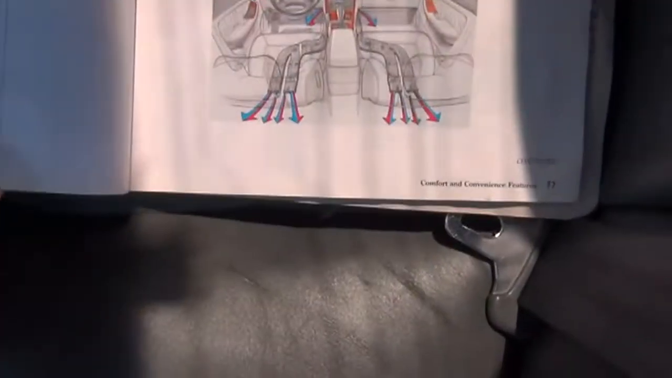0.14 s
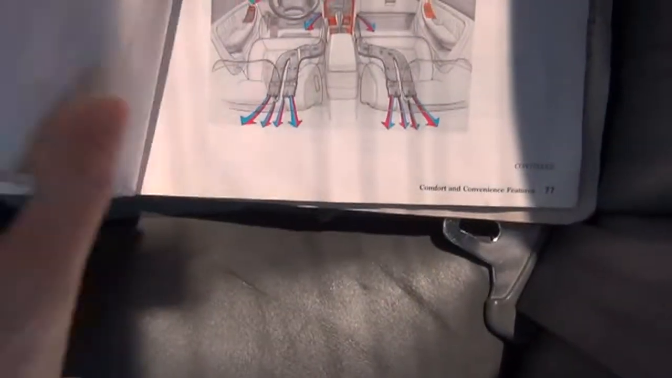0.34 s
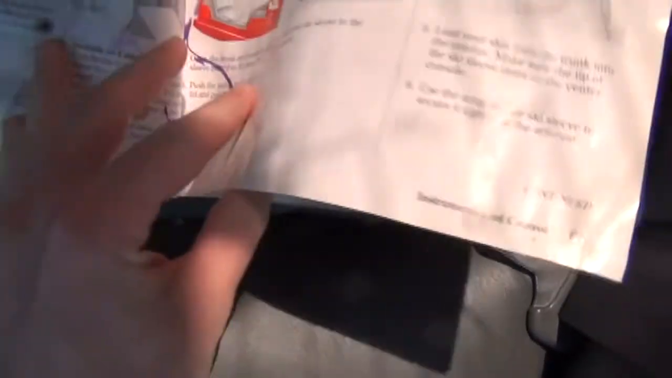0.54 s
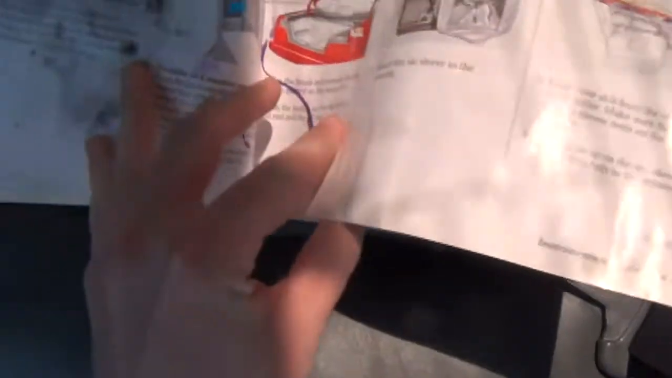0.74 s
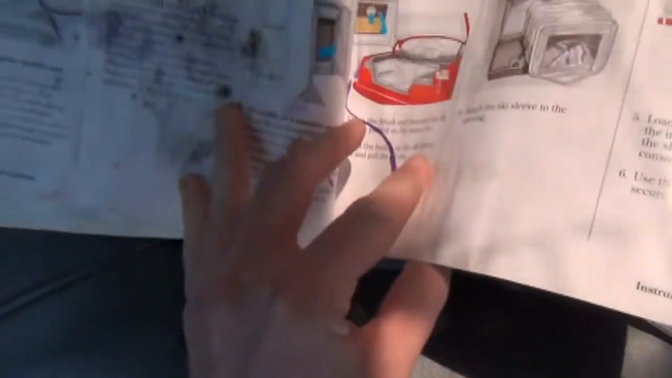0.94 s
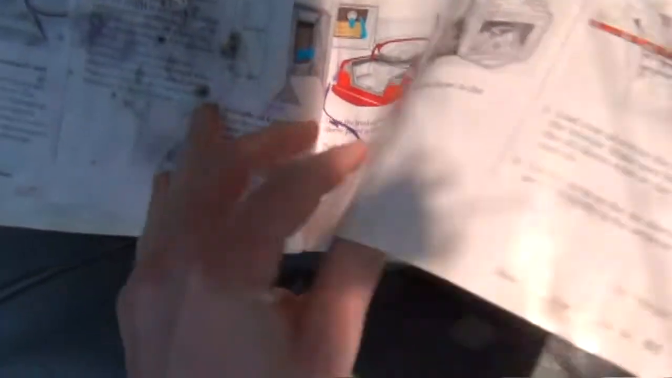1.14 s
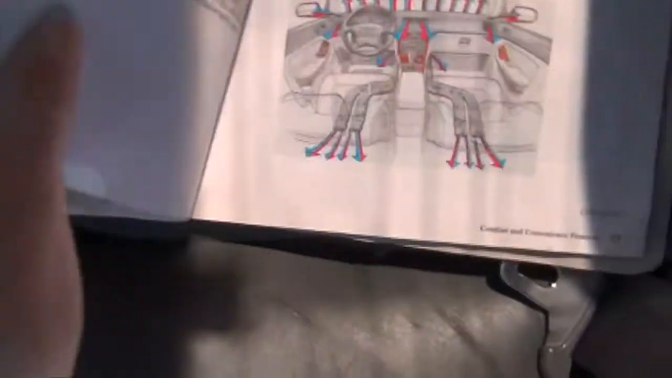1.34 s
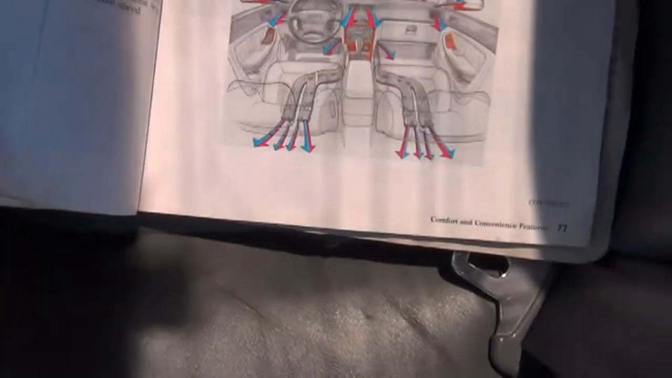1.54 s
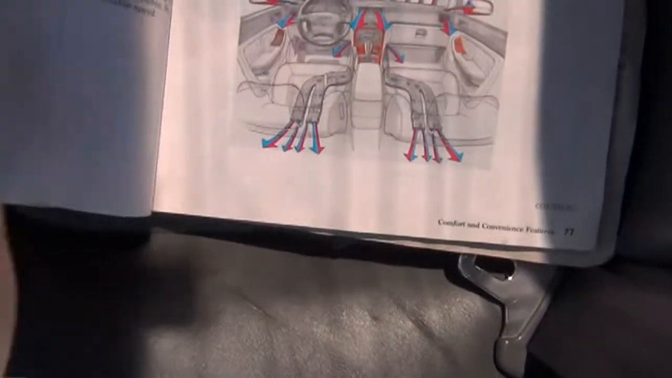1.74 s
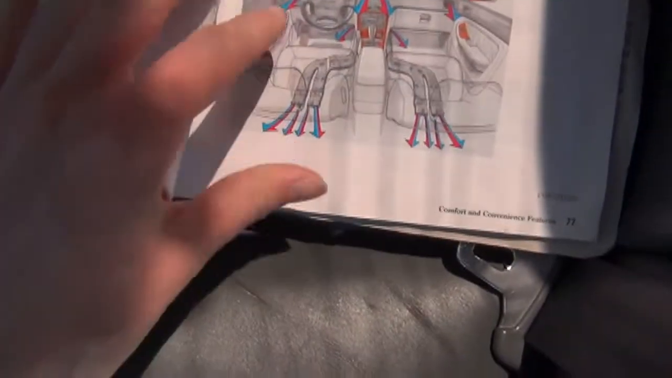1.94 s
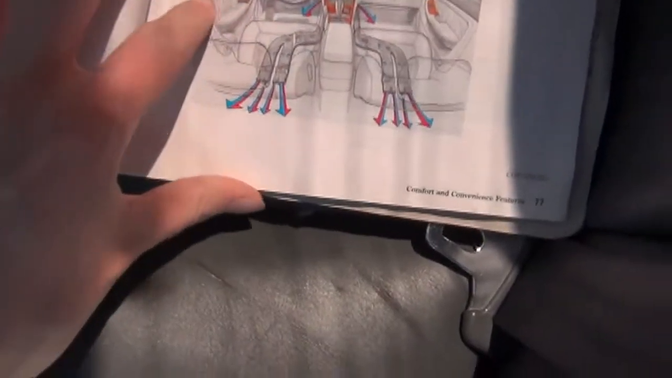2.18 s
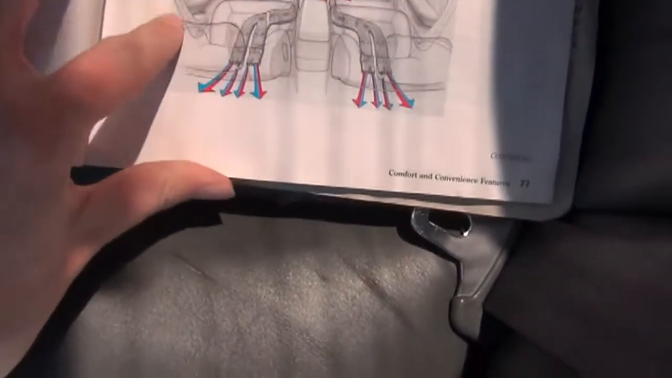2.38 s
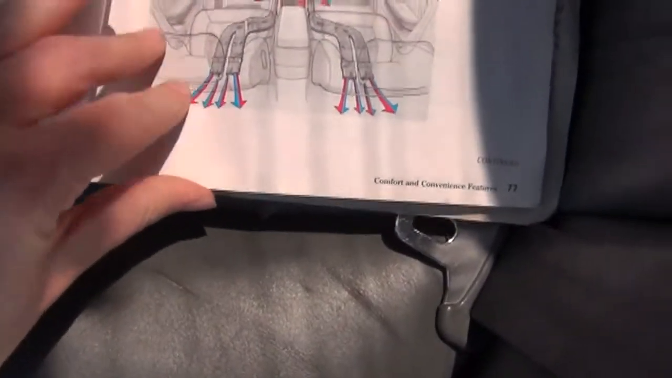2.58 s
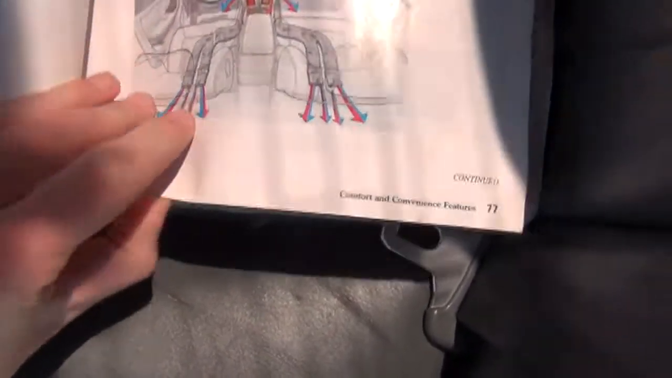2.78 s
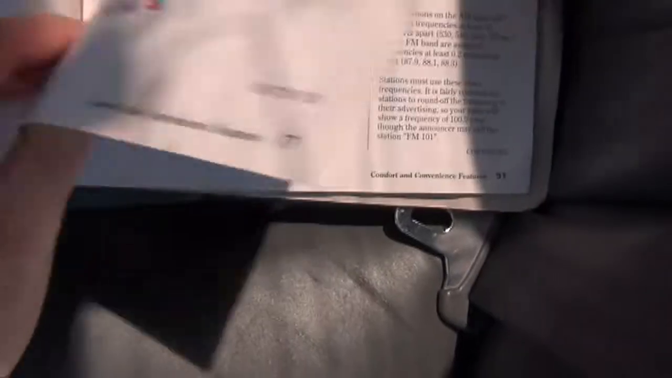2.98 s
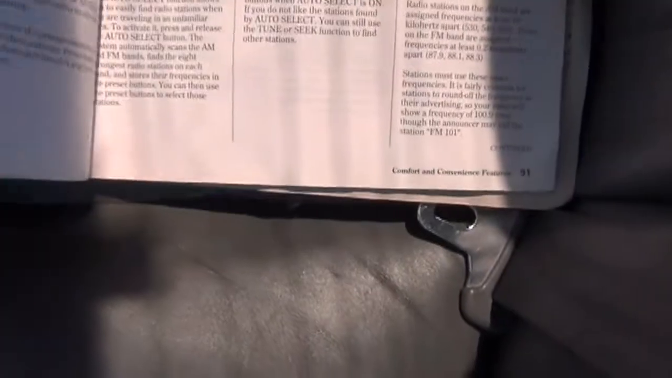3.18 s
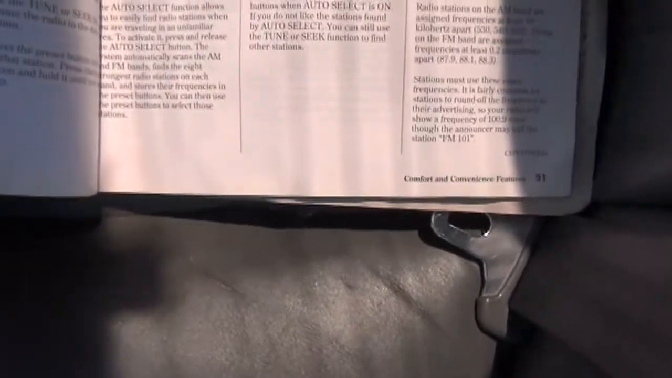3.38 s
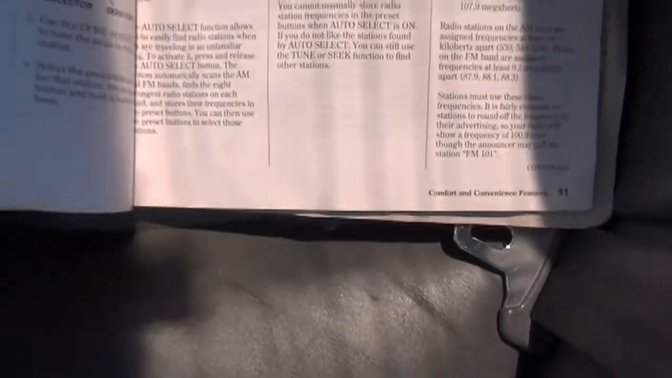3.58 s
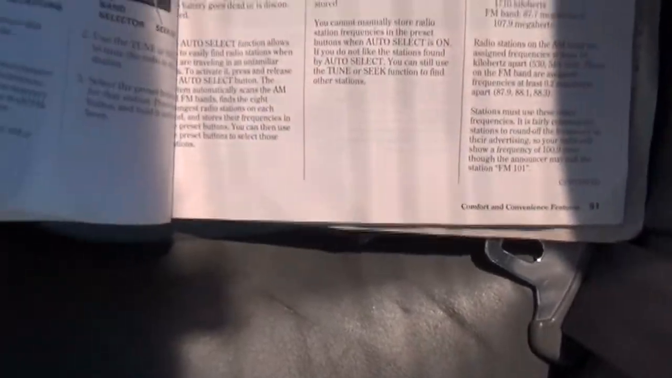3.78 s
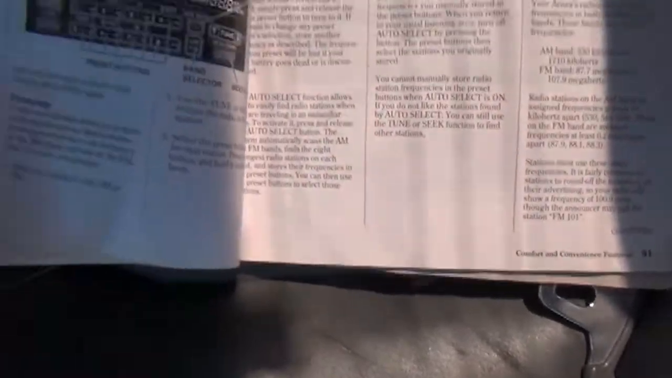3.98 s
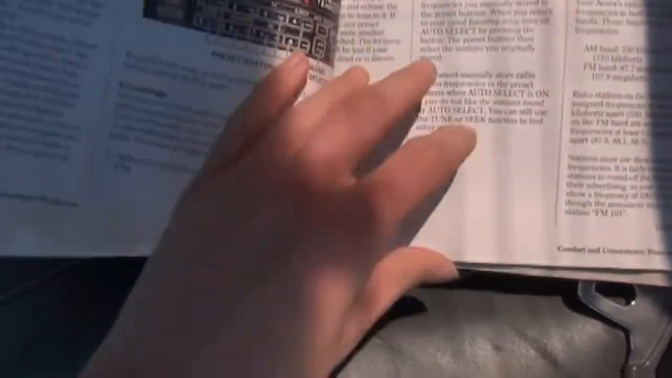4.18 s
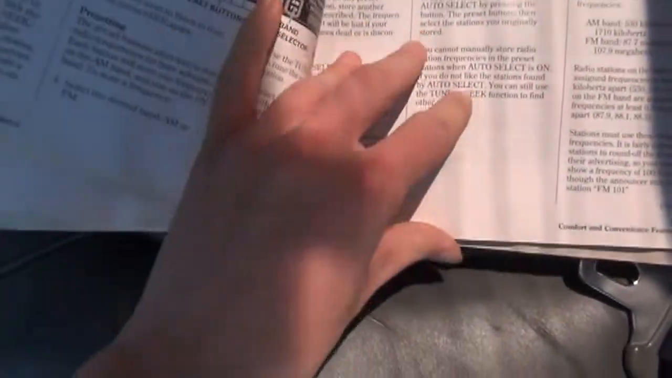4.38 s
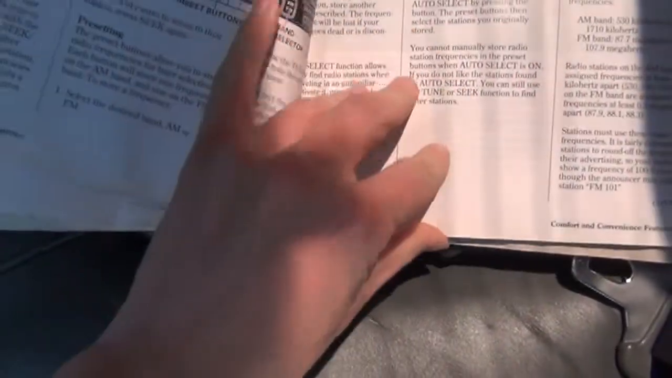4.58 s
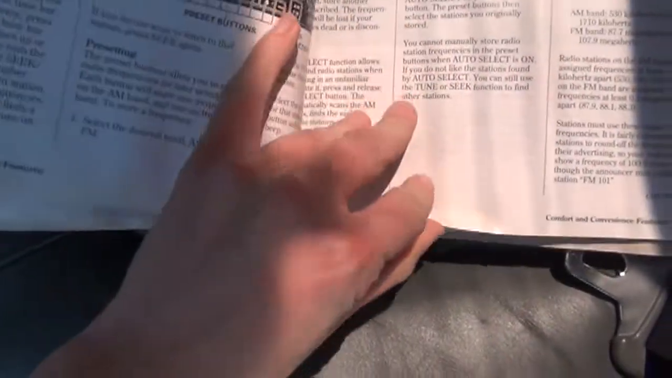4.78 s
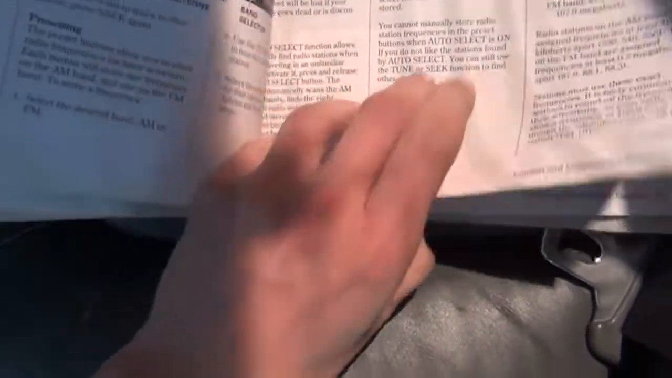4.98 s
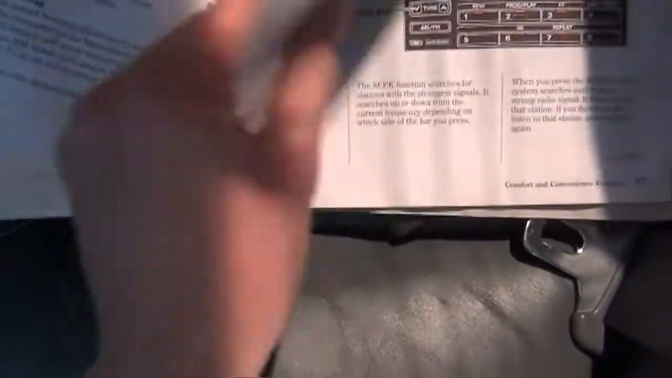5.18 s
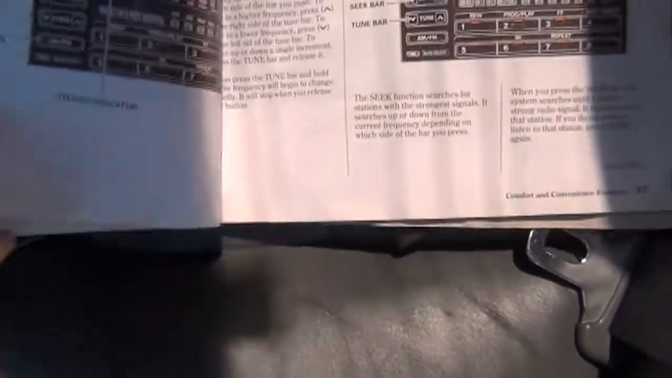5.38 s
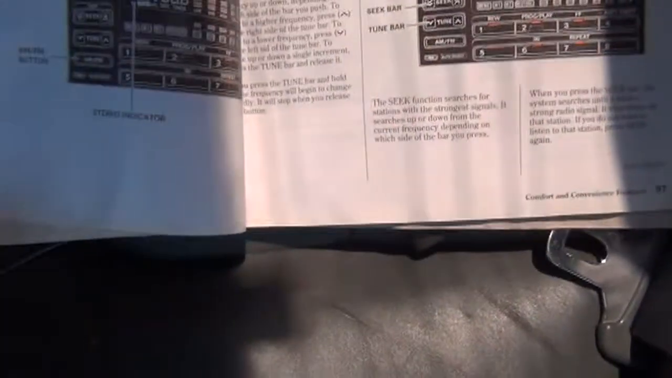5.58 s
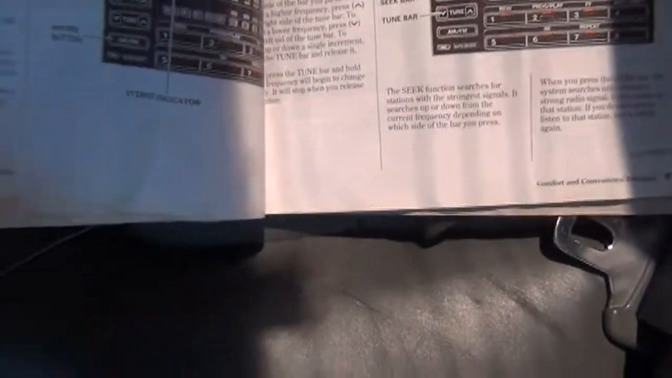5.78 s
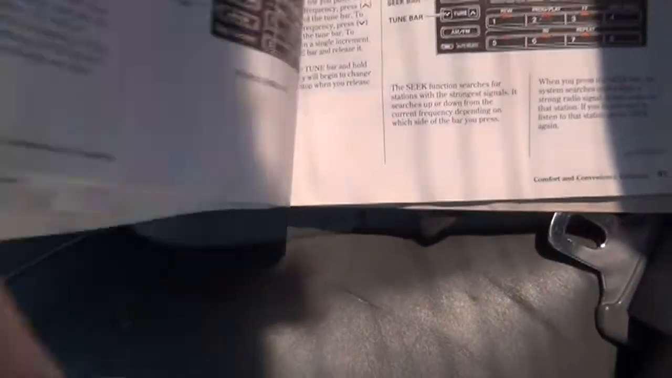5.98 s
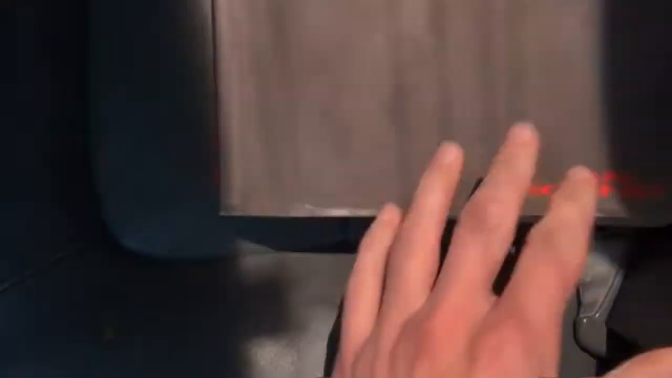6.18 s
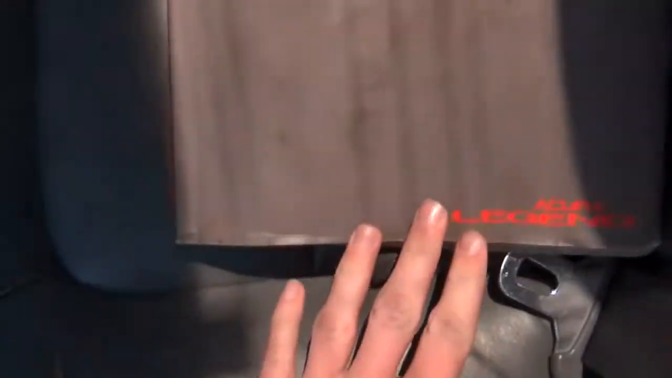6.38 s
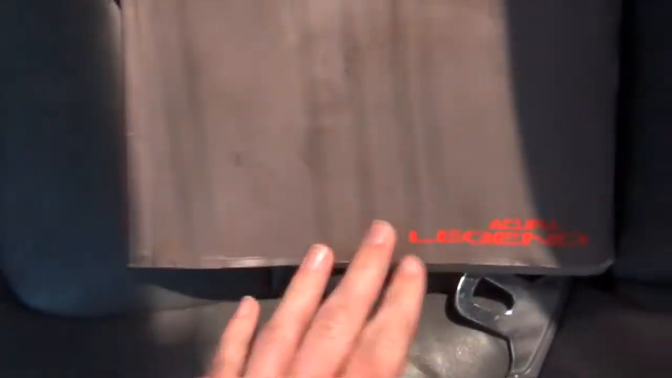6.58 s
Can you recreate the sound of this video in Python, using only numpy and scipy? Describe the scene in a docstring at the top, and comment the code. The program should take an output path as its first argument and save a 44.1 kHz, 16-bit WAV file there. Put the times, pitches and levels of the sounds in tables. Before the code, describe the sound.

Close paper rustling: sheets slide, buckle and snap in uneven bursts with short lulls, while handling bumps and airy puffs buffet the microphone.

```python
"""Inside a parked car, a hand leafs through a booklet close to a hand-held camera's microphone.
Sheets slide and scrape as shaped noise, buckle in short noise bursts and ring as dying sines.
The cabin answers with close reflections, made of random taps.
Puffs of air and handling buffet the microphone with low noise; soft thumps are short low pulses.
A steady quiet rumble and hiss lies underneath."""
import sys
import numpy as np
from scipy import signal
from scipy.fft import rfft, irfft, next_fast_len
from scipy.io import wavfile
from scipy.ndimage import uniform_filter1d

SR = 44100
rng = np.random.default_rng(int(sys.argv[2]) if len(sys.argv) > 2 else 0)


def output_pcm(signal):
    """Save a mono or channel-first signal as 16-bit PCM at the path in sys.argv[1].

    Samples are clipped to [-1, 1] before scaling.
    """
    pcm = np.clip(np.atleast_2d(signal).T, -1, 1) * 32767
    wavfile.write(sys.argv[1], SR, np.round(pcm).astype(np.int16))


N = 292383  # length in samples

# Steady background, as a spectrum. Each row: frequency in Hz, relative density in dB per Hz.
QUIET_SPECTRUM = [(15, -15), (30, 0), (120, -1), (250, -13), (600, -20), (1600, -21), (2200, -27),
                  (5000, -30), (11000, -29), (15800, -33)]
QUIET_DB = -51.5  # rms

# Air and handling at the microphone, as a spectrum. Each row: frequency in Hz, relative density in dB per Hz.
RUMBLE_SPECTRUM = [(18, -13), (30, 7), (92, 5.5), (144, 1), (250, -13), (400, -27), (600, -28), (1000, -40),
                   (1600, -84)]
# Puffs at the microphone. Each row: time of the peak in seconds, level in dB before the deep part is
# adjusted, build-up in seconds per 20 dB, dying away in seconds per 20 dB.
GUSTS = [(0, -28.5, .2, 1), (1.11, -20.5, 0.36, 0.038), (1.3, -32, 0.56, 0.96), (1.53, -48, .3, 0.13),
         (1.92, -32, 0.12, 0.11), (2.55, -35, 0.56, 0.31), (2.73, -36, 0.19, 1), (3.15, -36, 0.045, 0.34),
         (3.66, -37.5, .4, 0.33), (3.9, -34.5, 0.43, 0.11), (4.32, -26, 0.19, 0.2),
         (4.56, -35, 0.54, 0.049), (5.01, -27.5, 0.17, 0.21), (5.31, -18, 0.083, 0.13),
         (5.6, -20, 0.23, 0.096), (5.88, -36.5, 0.95, 0.62), (6.3, -29.5, 0.071, 1), (6.63, -31, 0.47, .4)]
# Below DEEP_HZ the rumble loses DEEP_LAG dB for each dB that the gusts rise.
DEEP_HZ, DEEP_LAG = 69.6, 0.39

# Soft thumps of hand and pages. Each row: start in seconds, level in dB before the pulse shape, pitch in Hz.
THUMPS = [(0.98, -17.5, 79), (1.056, -27, 99), (1.091, -29, 110), (3.137, -14.5, 260), (3.215, -16.5, 336),
          (4.29, -16, 109), (5.31, -32, 102), (5.543, -18, 119), (5.596, -21, 130), (5.683, -24, 81.5),
          (5.727, -21.5, 92), (5.843, -19.5, 89.5), (5.956, -24.5, 273), (6.076, -18.5, 248),
          (6.282, -13, 234), (6.301, -15, 144), (6.592, -15.5, 137)]

# Likeness of left and right channel. Each row: frequency in Hz, likeness from 0 to 1.
LIKENESS = [(30, 0.99), (90, 0.81), (170, 0.55), (400, 0.61), (1000, 0.68), (4000, 0.65), (12000, 0.55)]
# Where the pages are, left to right. Each row: time in seconds, left minus right in dB.
PLACE = [(0.0, 1.5), (4.15, 2), (4.97, -1.5), (5.61, 4), (6.63, -2.5)]

# Edges sliding, as a spectrum. Each row: frequency in Hz, relative density in dB per Hz.
HISS_SPECTRUM = [(1500, -14), (3500, -1), (5500, 1), (7500, 1), (9300, 1), (11000, 2), (13000, -0.5),
                 (15800, -7)]
# Sheets bending, as a spectrum before flutter and brightening. Each row: frequency in Hz,
# relative density in dB per Hz.
SCRAPE_SPECTRUM = [(150, -27), (350, 0), (800, 9), (1100, 5.5), (1450, 10), (2050, 8), (2750, 7.5),
                   (4500, 1.5), (8000, -9.5), (16000, -73)]
# Sheets sliding under the hand, some overlapping. Each row: start in seconds, length in seconds,
# hiss of edges in dB, scrape of bending in dB (both mid-slide, before smoothing and flutter),
# swell from start to end in dB.
SLIDES = [(0, 0.18, -35.5, -40.5, -5), (0.19, 0.58, -55.5, -60.5, -10.5), (0.289, 0.13, -43.5, -46.5, -1),
          (0.472, 0.13, -42, -49, 10), (1.125, 0.45, -46.5, -50.5, -7.5), (1.419, .28, -42, -47.5, 6.5),
          (1.846, 0.17, -41.5, -45.5, 4), (1.905, 0.052, -34, -37, 10.5), (1.67, 0.59, -53, -49.5, 2),
          (2.196, 0.027, -46, -51, 7), (2.296, 0.37, -52, -52.5, -6), (2.5, 0.062, -47, -51, 6),
          (2.575, 0.28, -51, -52.5, 6), (2.87, 0.15, -49, -41, -2), (2.98, 0.22, -40, -43.5, -3),
          (3.232, 0.091, -27.5, -45.5, -4), (3.327, 0.18, -53.5, -53, -16.5),
          (3.539, 0.12, -42.5, -46.5, 13), (3.66, 0.074, -40, -42.5, -1),
          (3.747, 0.16, -40.5, -44.5, -16.5), (3.905, 0.84, -58, -58, -2), (4.087, 0.16, -50.5, -53, -11),
          (4.136, 0.088, -37.5, -44.5, 5.5), (4.286, 0.054, -38.5, -45.5, 5.5),
          (4.246, 0.15, -55.5, -53, 9), (4.501, 0.019, -40, -47, -3), (4.543, 0.29, -52, -57.5, 1),
          (4.862, 0.4, -48.5, -52.5, -1), (5.049, 0.034, -67, -22.5, -3), (5.083, 0.034, -33, -23.5, -9),
          (5.217, 0.15, -44, -39, -8), (5.361, 0.057, -37.5, -31.5, -2), (5.428, 0.026, -39, -21, -1.5),
          (5.466, 0.089, -35.5, -60, 1), (5.555, 0.14, -39, -45, -7.5), (5.681, 0.17, -51.5, -50.5, -7),
          (5.854, 0.11, -36, -37, -1.5), (5.955, 0.12, -40, -47, 10.5), (6.068, 0.15, -45, -40.5, -4),
          (6.161, 0.073, -35, -47, -2), (6.235, 0.089, -52, -36, -5), (6.377, 0.12, -49, -58.5, -21)]
SLIDE_EDGE_S, SLIDE_TAIL_DB_PER_S = 0.018, -700.0  # smoothing of the level; fade after the end
# Released sheets that flap and settle. Each row: start in seconds, hiss in dB, scrape in dB
# (both at the start, before flutter and brightening).
FLAPS = [(0.417, -38, -29.5), (1.451, -27.5, -31.5), (2.659, -33, -27), (3.059, -29.5, -22.5),
         (3.138, -36, -26), (4.521, -29, -35), (4.862, -36, -29), (4.928, -31.5, -31), (4.963, -29, -27),
         (5.125, -32, -36), (5.202, -28, -22), (5.28, -24.5, -28), (5.558, -34, -30.5), (6.281, -26, -20.5)]
FLAP_RISE_S, SETTLE_DB_PER_S = 0.0013, -380.0
# Harder bending scrapes brighter: dB above BRIGHT_HZ per dB of scrape level.
BRIGHTEN, BRIGHT_HZ = 0.22, 1980

# Snaps of buckling paper. Each row: start in seconds, peak level in dB before placing and clipping,
# ring in Hz, crack setting in dB (offset below), 60 dB decay in seconds (never under 0.004).
SNAPS = [(0.008, -11, 4500, -30, 0.014), (0.034, -19, 2800, -2, 0.014), (0.4151, -5, 3050, -14, 0.0055),
         (0.423, -12, 564, -7, 0.013), (0.562, -9.5, 2600, 9.5, 0.0018), (0.58, -6, 10600, 34, 0.0096),
         (0.593, -24, 1260, -3, 0.03), (0.609, -19.5, 1660, -21, 0.01), (0.632, -23.5, 1200, -48, 0.0056),
         (0.6545, -12, 626, -23, 0.012), (0.6875, -14.5, 2900, -16, 0.01), (0.937, -32.5, 1630, -69, 0.015),
         (1.342, -28.5, 1260, -66, 0.023), (1.442, -16.5, 1120, 7, 0.011), (1.454, -12, 2520, 4, 0.029),
         (1.726, -22.5, 1440, -13, 0.035), (1.972, -18, 1040, -30, 0.014), (2.56, -24.5, 2500, -17, 0.026),
         (2.572, -25, 636, -37, 0.017), (2.661, -7, 2010, -3.5, 0.015), (2.779, -10.5, 2550, -25, 0.0091),
         (2.839, -30, 1480, -60, 0.054), (2.892, -20, 1030, -62, 0.028), (2.899, -12, 1066, -59, 0.021),
         (2.919, -24.5, 980, -61, 0.055), (2.946, -19.5, 624, -57, 0.0099),
         (2.969, -7.5, 4300, -16, 0.0099), (3.062, -14, 2670, -22, 0.036), (3.134, -13.5, 1480, -38, 0.029),
         (3.138, -7, 1920, -52, 0.012), (3.142, -12.5, 2200, -43, 0.01), (3.153, -16.5, 7300, 4, 0.033),
         (3.196, -19, 1220, -55, 0.011), (3.214, -7.5, 2300, -40, 0.019), (3.227, -12.5, 6300, -8, 0.022),
         (3.255, -11.5, 8790, 13, 0.02), (3.287, -13, 2700, 20, 0.037), (3.301, -12, 7500, 2, 0.038),
         (3.336, -18, 1240, -20.5, 0.025), (3.545, -29.5, 1300, -12, 0.0074),
         (3.665, -11, 1380, -25, 0.022), (3.855, -24, 6600, -1, 0.074), (4.108, -22.5, 1340, -12, 0.038),
         (4.297, -21, 655, -61, 0.006), (4.34, -19.5, 930, -47, 0.013), (4.52, -20, 10000, 20, 0.013),
         (4.528, -9, 9800, 3.5, 0.056), (4.58, -24.5, 11000, 12, 0.0079), (4.66, -21.5, 1230, -54, 0.0078),
         (4.864, -15.5, 3520, -7, 0.017), (4.87, -14.5, 2700, -56, 0.027), (4.888, -16, 2400, 0, 0.0048),
         (4.923, -9, 2360, -15, 0.0076), (4.936, -21, 850, -16, 0.023), (4.961, -12.5, 2450, -22, 0.0073),
         (4.966, -7.5, 1760, -1, 0.019), (5.048, -19, 1615, -34, 0.035), (5.066, -15, 2070, -19, 0.023),
         (5.127, -7.5, 4520, -16, 0.0073), (5.196, -11, 3850, 1, 0.015), (5.213, -11.5, 1500, -7, 0.03),
         (5.257, -16.5, 755, -53, 0.024), (5.278, -10, 10900, 10, 0.018), (5.303, -10, 1200, -14, 0.0067),
         (5.31, -7, 1316, -66, 0.012), (5.372, -10.5, 1400, -18, 0.022), (5.386, -10, 2380, -11, 0.02),
         (5.4205, -9, 2500, -4, 0.025), (5.434, -17, 1540, -9, 0.02), (5.478, -12, 10500, -30, 0.0083),
         (5.483, -16, 4430, 6, 0.0066), (5.536, -17.5, 8900, 11, 0.011), (5.554, -9, 3690, -12, 0.015),
         (5.564, -13.5, 2560, -10, 0.027), (5.6, -23, 1250, -34, 0.014), (6.079, -14, 1690, 2, 0.032),
         (6.1, -24.5, 2400, -38, 0.014), (6.205, -15.5, 1430, -3, 0.029), (6.228, -16, 1740, -4, 0.035),
         (6.256, -22, 1470, -21, 0.0091), (6.279, -9.5, 820, -57, 0.025), (6.29, -15, 550, -19, 0.032),
         (6.307, -11, 497, -9, 0.0037), (6.32, -15, 485, 6, 0.049)]
# Taut sheets flicked, one clear note each. Each row: start in seconds, starting level in dB before placing
# and clipping, pitch in Hz, 60 dB decay in seconds.
PINGS = [(2.779, -8, 1690, 0.019), (5.372, -11.5, 1345, 0.029)]


def gain_of(db):
    """Decibels to amplitude."""
    return 10 ** (np.asarray(db) / 20)


def evened(x):
    """Scales to rms 1."""
    return x / np.sqrt(np.mean(x ** 2) + 1e-20)


def curve(rows):
    """Rows of seconds and value, interpolated at every sample."""
    return np.interp(np.arange(N) / SR, *np.transpose(rows))


def read(points, hz):
    """Reads a table over frequency, interpolated on a log axis."""
    f, value = np.transpose(points)
    return np.interp(np.log(hz + 1), np.log(f + 1), value)


def coloured(pair, points):
    """Gives two unrelated signals a spectrum and the left-right likeness, at rms 1."""
    n = next_fast_len(N, True)
    hz = np.fft.rfftfreq(n, 1 / SR)
    a, b = rfft(pair, n)
    same = read(LIKENESS, hz)
    stereo = np.array([a, same * a + np.sqrt(1 - same ** 2) * b])
    return evened(irfft(stereo * gain_of(read(points, hz)), n)[:, :N])


def low_part(x, hz):
    """What lies below hz, without delay."""
    return signal.sosfiltfilt(signal.butter(2, hz, fs=SR, output="sos"), x)


def band(x, lo_hz, hi_hz):
    """Causal band-pass, scaled to peak 1."""
    y = signal.sosfilt(signal.butter(2, [lo_hz, hi_hz], "band", fs=SR, output="sos"), x)
    return y / abs(y).max()


def wander(ms):
    """Smooth random curve of rms 1: noise averaged twice over ms."""
    n = round(ms * SR / 1000)
    return evened(uniform_filter1d(uniform_filter1d(rng.standard_normal(N), n), n))


def quiet():
    """Steady low rumble and faint hiss: noise with a fixed spectrum."""
    return gain_of(QUIET_DB) * coloured(rng.standard_normal((2, N)), QUIET_SPECTRUM)


def buffet():
    """Lumpy low noise of air and handling that swells and dies with each gust; strong gusts are less deep."""
    lumps = rng.standard_normal((2, N)) * gain_of(2.6 * wander(ms=14))
    t = np.arange(0, N / SR + 0.01, 0.005)
    power = np.zeros(len(t))
    for s, db, up, down in GUSTS:
        drop_db = 20 * np.maximum((s - t) / up, (t - s) / down)
        power += gain_of(db - drop_db) ** 2
    level_db = curve(np.transpose([t, 10 * np.log10(power)]))
    rumble = coloured(lumps, RUMBLE_SPECTRUM)
    deep = low_part(rumble, DEEP_HZ)
    lagging = deep * gain_of(-DEEP_LAG * (level_db + 47.0))
    return gain_of(level_db) * (rumble - deep + lagging)


def thumps(cycles=1.39):
    """A low push and a weaker pull back, without ring."""
    out = np.zeros(N + 4000)
    for s, db, hz in THUMPS:
        u = np.arange(round(cycles / hz * SR)) / SR * hz  # cycles since the start
        pulse = np.sin(2 * np.pi * u) * np.sin(np.pi * np.sqrt(u / cycles))
        out[round(s * SR):][:len(u)] += gain_of(db) * pulse
    return out[:N]


def cabin(x, t60=0.052):
    """Close reflections from seats and glass: random taps that die fast, partly alike left and right."""
    t = np.arange(6000) / SR
    signs = rng.choice([-1., 1.], (2, len(t)))
    taps = signs * (rng.random((2, len(t))) < 0.2) * (t > 0.0015)
    shared = (taps + 0.43 * taps[::-1]) * gain_of(-60 * t / t60)
    shared = signal.lfilter([1], [1, -0.7], shared)  # duller than the direct sound
    shared /= np.linalg.norm(shared, axis=1)[:, None]
    return signal.oaconvolve(x[None], shared, axes=1)[:, :N]


def patchy(x, patchy_db):
    """Bent sheets change colour: random hills of some 50 ms by 1 kHz over time and frequency."""
    z = signal.stft(x, nperseg=256, noverlap=192)[2]
    hills = uniform_filter1d(rng.standard_normal(z.shape[1:]), size=5, axis=0)
    hills = uniform_filter1d(uniform_filter1d(hills, size=25, axis=1), size=25, axis=1)
    y = signal.istft(z * gain_of(patchy_db * evened(hills)), nperseg=256, noverlap=192)[1]
    return evened(y[:, :N])


def friction(points, per_s, spread_db, grain_db, patchy_db):
    """Fine rubbing noise, made louder by slips of uneven size."""
    sizes = gain_of(spread_db * np.minimum(rng.exponential(1, N), 5))
    slips = sizes * (rng.random(N) < per_s / SR)
    slips = signal.lfilter([1], [1, -0.98], slips)  # each slip lasts about a millisecond
    drive = rng.standard_normal((2, N)) * (1 + gain_of(grain_db) * evened(slips))
    return patchy(coloured(drive, points), patchy_db)


def crackle(per_s, spread_db, cycles, count=14):
    """Tiny creases popping: short dying sines of many pitches, a few of them large."""
    out = np.zeros(N)
    for hz in np.geomspace(900, 8000, count):
        u = np.arange(round(3 * cycles / hz * SR)) / SR * hz
        grain = np.sin(2 * np.pi * u) * np.exp(-u / cycles)
        sizes = gain_of(spread_db * np.minimum(rng.exponential(1, N), 4))
        pops = sizes * (rng.random(N) < per_s / count / SR)
        out += signal.oaconvolve(pops, grain)[:N]
    return evened(out)


def add(power, s, levels_db, shape):
    """Adds the power of one event's hiss and scrape."""
    part = power[:, round(s * SR):][:, :len(shape)]
    part += (gain_of(levels_db)[:, None] * shape[:part.shape[1]]) ** 2


def slides():
    """Levels of hiss and scrape: every slide starts softly, swells or tires, and fades out."""
    power = np.zeros((2, N))
    for s, length, *levels_db, swell_db in SLIDES:
        t = np.arange(round(length * SR) + 6000) / SR
        shape_db = swell_db * (np.minimum(t / length, 1) - 0.5)
        shape_db += SLIDE_TAIL_DB_PER_S * np.maximum(t - length, 0)
        add(power, s, levels_db, gain_of(shape_db))
    return uniform_filter1d(np.sqrt(power), size=round(SLIDE_EDGE_S * SR))


def flaps():
    """Levels of hiss and scrape: every flap starts almost at once and settles at one speed."""
    t, power = np.arange(8000) / SR, np.zeros((2, N))
    shape = np.minimum(t / FLAP_RISE_S, 1) * gain_of(SETTLE_DB_PER_S * t)
    for s, *levels_db in FLAPS:
        add(power, s, levels_db, shape)
    return np.sqrt(power)


def sheets():
    """Bright hiss of edges sliding; duller scrape and crackle of sheets bending."""
    hiss = friction(HISS_SPECTRUM, per_s=130, spread_db=9.5, grain_db=-10.0, patchy_db=1.5)
    scrape = friction(SCRAPE_SPECTRUM, per_s=600, spread_db=2.5, grain_db=-6.0, patchy_db=1.5)
    scrape *= gain_of(2.3 * wander(ms=6.6))  # loose sheets flutter
    pops = crackle(per_s=500, spread_db=6.0, cycles=1.5)
    hiss_level, scrape_level = np.hypot(slides(), flaps())
    dull = low_part(scrape, BRIGHT_HZ)
    bright = (scrape_level / gain_of(-36.5)) ** BRIGHTEN
    bending = (dull + bright * (scrape - dull)) * scrape_level
    creases = gain_of(-13.0) * pops * scrape_level ** 0.82  # pops grow less than the scrape
    return hiss * hiss_level + bending + creases


def pings():
    """A taut sheet rings on one note: a dying sine for each flick."""
    t, out = np.arange(3000) / SR, np.zeros(N)
    for s, db, hz, t60 in PINGS:
        out[round(s * SR):][:len(t)] += gain_of(db - 60 * t / t60) * np.sin(2 * np.pi * hz * t)
    return out


def snaps():
    """Each buckle is a short dying burst: a ring of the bent sheet, a broad body, a thud and a crack."""
    t, out = np.arange(3000) / SR, np.zeros(N + 3000)
    noises = rng.standard_normal((len(SNAPS), len(t)))
    for (s, db, hz, crack_db, t60), noise in zip(SNAPS, noises):
        rise = np.minimum(t * hz / 0.8, 1)  # large folds give way more slowly
        burst = noise * gain_of(-60 * t / max(t60, 0.004)) * rise
        ring = band(burst, hz * 0.73, hz * 1.373)
        thud = band(burst, 266, 874)
        # body and crack fade faster than the ring, the body fastest
        body = band(burst * gain_of(-2500. * t), 1240, 4670)
        crack = band(burst * gain_of(-1500. * t), 5200, 10600)
        snap = ring + gain_of(crack_db / 3 + 9.0) * body
        snap += gain_of(1.0 - 6.1 * np.log2(hz / 600)) * thud  # large folds thud
        snap += gain_of(crack_db + 6.0) * crack
        out[round(s * SR):][:len(t)] += gain_of(db) * snap / abs(snap).max()
    return out[:N]


def scene():
    """Paper placed left or right, its reflections, thumps, buffeting and the quiet background."""
    sharp = snaps() + pings()
    side = gain_of(np.outer([0.5, -0.5], curve(PLACE)))
    paper = side * (sharp + sheets())
    reflections = gain_of(-10.0) * cabin(sharp)
    return paper + reflections + thumps() + buffet() + quiet()


def record(dry):
    """The microphone channel: loud peaks are softly clipped, then the treble ends at a band limit."""
    clipped = 1.066 * np.tanh(dry / 0.82)
    limit = signal.firwin(511, 15900, window=("kaiser", 9), fs=SR)  # cutoff in Hz
    return signal.oaconvolve(clipped, limit[None], "same")


dry = scene()
out = record(dry)
output_pcm(out)
```